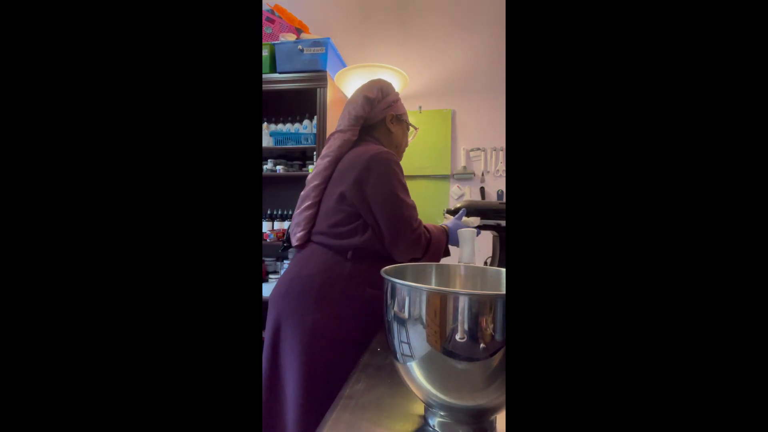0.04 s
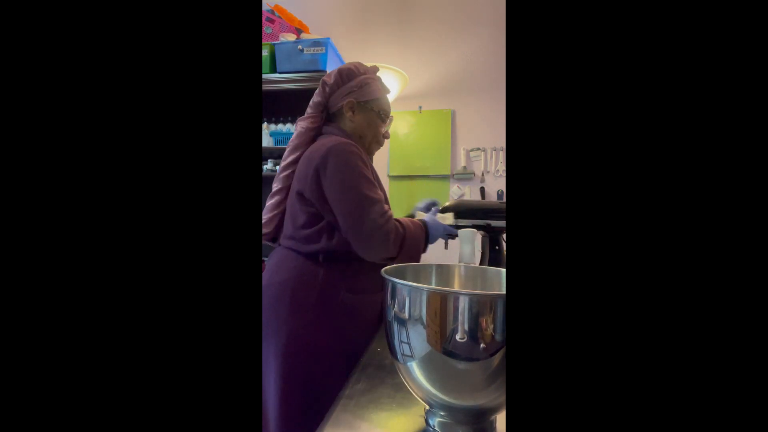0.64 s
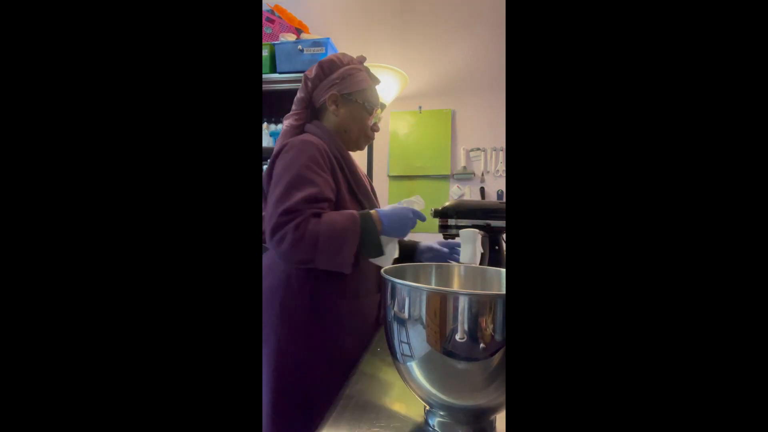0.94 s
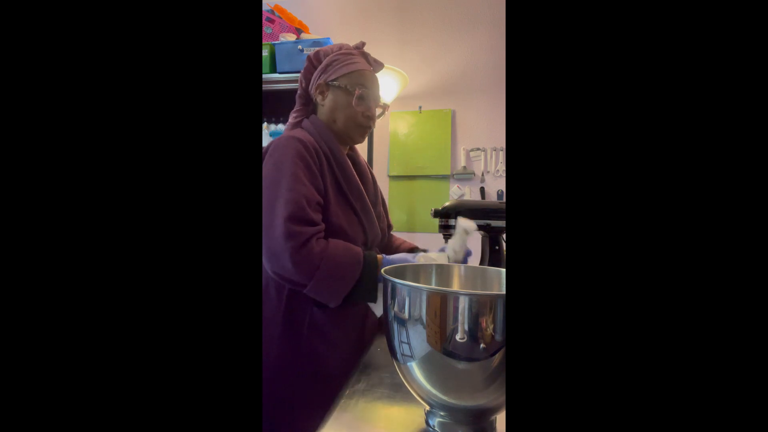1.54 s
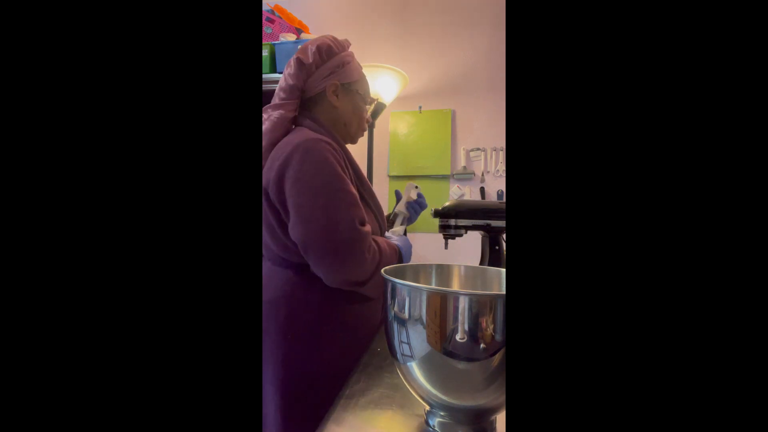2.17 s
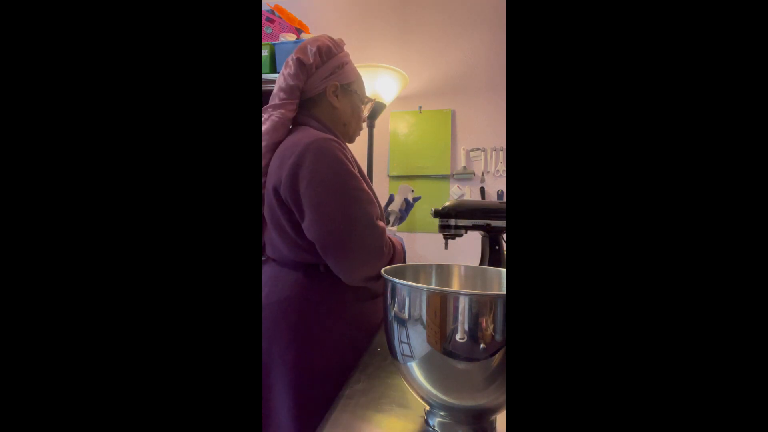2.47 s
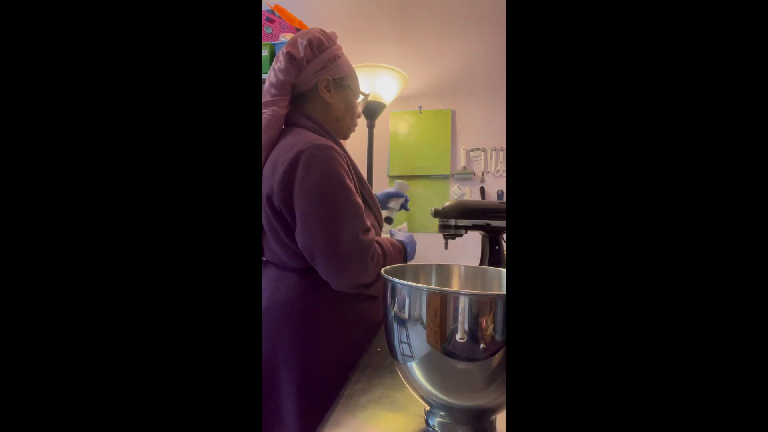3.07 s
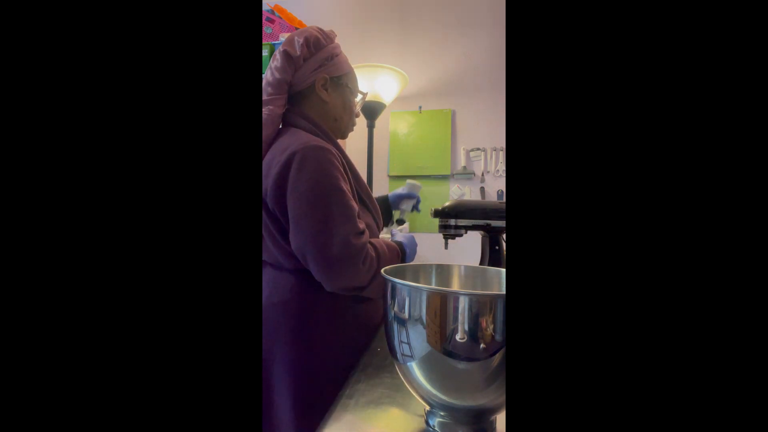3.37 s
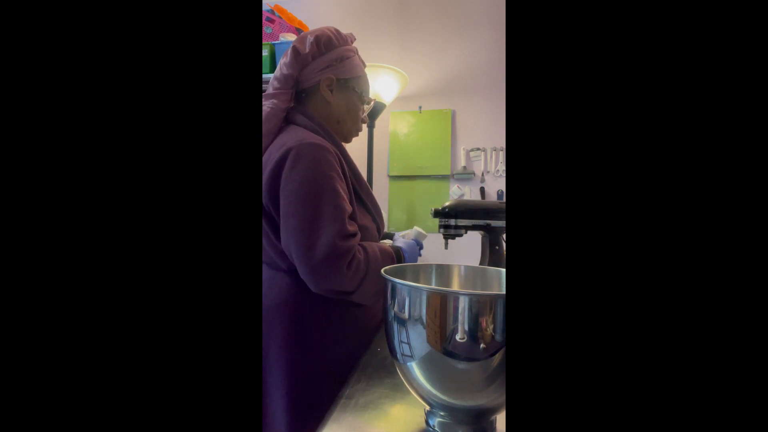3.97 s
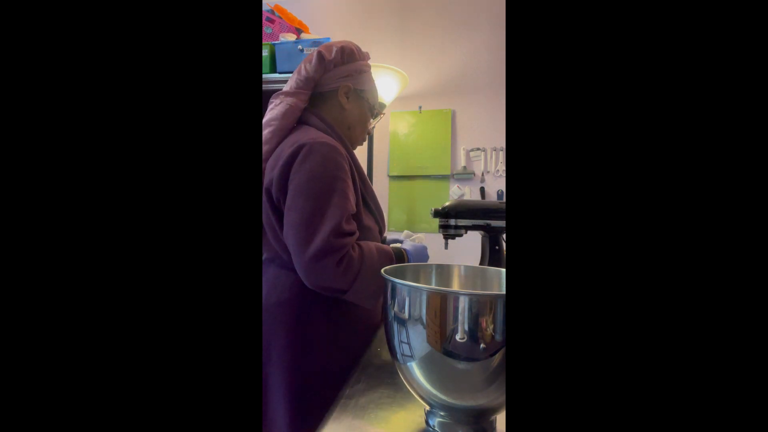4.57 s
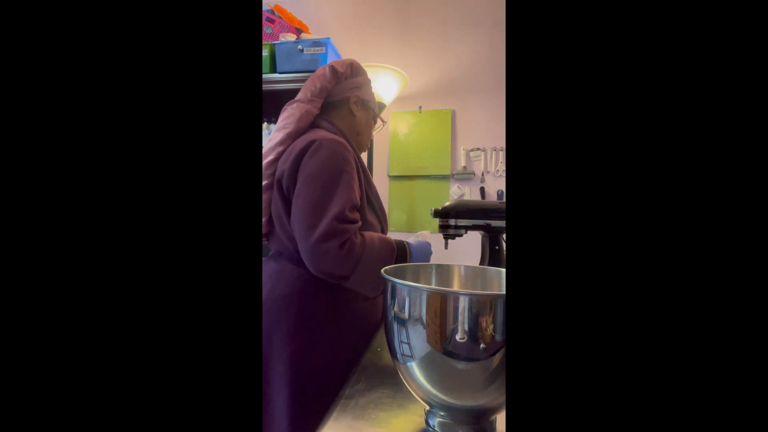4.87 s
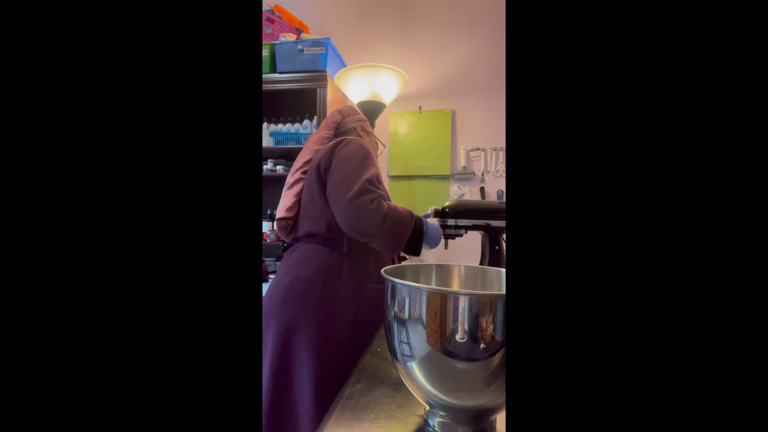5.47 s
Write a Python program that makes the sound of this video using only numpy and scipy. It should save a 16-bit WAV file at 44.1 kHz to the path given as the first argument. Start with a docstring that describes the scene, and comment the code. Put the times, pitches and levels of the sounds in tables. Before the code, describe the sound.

Something slides on a steel counter, a thump and a hard knock follow, then a mist sprayer hisses steadily with faint hollow clunks.

```python
"""A mist sprayer is pumped at a steel kitchen counter: the nozzle hisses steadily on stored pressure
while the hollow bottle clunks at each stroke. Before that, something slides over the steel, a thump
and a container's hard knock shake the counter, and the sprayer is picked up. Gloves rub and crinkle,
a steel bowl rings in sympathy, room air murmurs. The microphone stands on the counter."""
import sys
import numpy as np
from scipy import signal
from scipy.fft import rfft, irfft, next_fast_len
from scipy.io import wavfile
from scipy.ndimage import map_coordinates

SR = 44100
rng = np.random.default_rng(int(sys.argv[2]) if len(sys.argv) > 2 else 0)


def output_pcm(signal):
    """Save a mono or channel-first signal as 16-bit PCM at the path in sys.argv[1].

    Samples are clipped to [-1, 1] before scaling.
    """
    pcm = np.clip(np.atleast_2d(signal).T, -1, 1) * 32767
    wavfile.write(sys.argv[1], SR, np.round(pcm).astype(np.int16))


N = 247401

# modes of the steel sheet: f/Hz, level/dB, t60/s
STEEL_MODES = [(220, -35, 0.58), (394, -39, 2.6), (1728, -34, 1.2), (4205, -51, .75), (5534, -50, 0.5),
               (5635, -53, .5), (6265, -46, 0.42), (6750, -46, 0.65), (6920, -52, 0.9), (7811, -48, 0.6),
               (8260, -50, 0.7), (8667, -51, .6)]
# hiss of sliding on steel: f/Hz, density/dB
SLIDE_HISS_SPECTRUM = [(2500, -6), (4800, -10), (6500, -1), (8200, -3), (10000, -5), (15000, -11)]
# glove friction: f/Hz, density/dB
RUB_SPECTRUM = [(400, -0.5), (800, 4), (1600, 0.5), (2500, 1), (4000, -4), (7000, -13.5)]
# room decay: f/Hz, t60/s
ROOM_DECAY = [(80, 0.26), (300, 0.58), (1000, 0.4), (4000, 0.33), (15000, 0.26)]


def mist():
    """Stored pressure sags slowly and keeps the nozzle hissing; fine spray sputters above the jet."""
    # jet, its lower band, finest spray: f/Hz, density/dB
    jet_spectrum = [(500, -19), (1000, -16), (2400, -6.5), (3200, -6.5), (4200, -3.5), (6000, -2.5),
                    (8100, 0), (9700, -0.5), (12500, -10)]
    low_spectrum = [(3800, -6), (4700, -3), (6000, -16)]
    fine_spectrum = [(9000, -37), (12000, -9.5), (14000, -9.5), (15500, -10.5)]
    # lower band as the nozzle turns: t/s, level/dB re jet
    low_levels = [(2.8, -15), (3.7, -8.5), (3.821, -5.5), (3.919, -11), (4.3, -25.5), (5.1, -20.5)]
    # nozzle sputters: t/s, level/dB
    sputters = [(3.128, -43.5), (3.168, -43.5), (3.241, -45), (3.625, -45.5), (3.83, -53), (4.185, -58)]
    open_s, fine_delay_s = 2.765, 0.006  # fine spray needs full pressure
    flow = dict(hold_s=2.362, rise_s=0.027, fall_s=0.015)
    jet = from_db(-51.5) * swell(open_s, **flow, sag_db_per_s=1)
    fine = from_db(-55) * swell(open_s + fine_delay_s, **flow, sag_db_per_s=1.1)
    for t_s, db in sputters:
        fine = np.hypot(fine, from_db(db) * swell(t_s, hold_s=0.01, rise_s=0.0051, fall_s=0.048))
    stream = friction(jet_spectrum, rough_db=-0.45, slips_per_s=5.9)
    stream = flutter(stream, depth_db=1.8, rate_hz=10.7)
    hiss = jet * stream + fine * friction(fine_spectrum, rough_db=1, slips_per_s=26)
    low_db = np.interp(np.arange(N) / SR, *np.transpose(low_levels))
    hiss += from_db(low_db) * jet * friction(low_spectrum, rough_db=13, slips_per_s=6.7)
    whistle_hz, width_hz = 8149.5, 140  # the nozzle sings as pressure drops
    whistle = rms_one(resonance(stream, whistle_hz, q=whistle_hz / width_hz))
    hiss += from_db(-62) * whistle * swell(5, hold_s=0.3, rise_s=0.11, fall_s=0.13)
    return panned(hiss, pan_db=0.5)


def flutter(x, depth_db, rate_hz):
    """Turbulence makes each treble band swell and fade on its own."""
    centres_hz = np.geomspace(2000, 15000, 8)
    padded = next_fast_len(N)
    hz = np.fft.rfftfreq(padded, 1 / SR)
    spectrum, out = rfft(x, padded), 0
    for share in np.eye(len(centres_hz)):
        band = irfft(spectrum * np.interp(hz, centres_hz, share), padded)[:, :N]
        out += band * from_db(depth_db * drift(rate_hz))
    return rms_one(out)


def bottle():
    """Jolts and trigger strokes ring the bottle as long as the grip allows; fingers tap it faintly."""
    # hollow clunks: t/s, level/dB, f/Hz
    clunks = [(1.271, -41.5, 1002), (1.847, -42.5, 911), (1.932, -37.5, 930), (1.953, -35.5, 905),
              (2.151, -39.5, 780), (2.170, -39, 920), (2.191, -50, 950), (2.272, -44.5, 750),
              (2.491, -50, 714), (2.564, -50.5, 600), (2.741, -49, 1210), (2.995, -49, 947),
              (3.295, -46, 920), (3.592, -44, 937), (3.927, -44.5, 988), (4.249, -42.5, 950),
              (4.786, -45.5, 948), (5.092, -40.5, 820), (5.106, -41, 903), (5.247, -50.5, 860)]
    # plastic wall: f/Hz, density/dB
    shell_spectrum = [(350, -4.5), (650, -1), (1100, -5), (1500, -9), (2600, -17), (5000, -16.5)]
    builds_s = 0.0036 * 1.3 ** rng.standard_normal(len(clunks))
    hollow = sum(hollow_note(clicks([t_s], [db]), hz, build_s)
                 for (t_s, db, hz), build_s in zip(clunks, builds_s))
    times_s, levels_db, _ = np.transpose(clunks)
    when, strength = rng.random((30, 2)).T
    taps = clicks(times_s=1.6 + 3.9 * when, levels_db=-62 + 8 * strength)
    force = taps + from_db(-13) * clicks(times_s, levels_db)
    shell = through(force, burst(shell_spectrum, t60_s=0.02, room_db=-3.5))
    flexing = sum(from_db(db) * swell(t_s, hold_s=0.0034, rise_s=0.003, fall_s=0.022)
                  for t_s, db, _ in clunks)
    wall_band = signal.butter(2, [650, 1150], "band", fs=SR, output="sos")
    wall = from_db(-9.5) * flexing * rms_one(signal.sosfilt(wall_band, noise(shell_spectrum)))
    hollow = from_db(-1.5) * in_kitchen(hollow, wet_db=-7.5, lag_s=-0.000072, pan_db=6.5)
    return hollow + panned(shell + wall, pan_db=4)


def hollow_note(force, hz, build_s):
    """Wall and enclosed air ring together: the note builds up, then dies."""
    t60_s = build_s * np.log(1000)
    return ring(ring(force, hz, t60_s), hz, t60_s) * 2 * np.e / (build_s * SR)


def knock():
    """A container lands hard and rattles to rest, ringing itself and the counter."""
    # contacts: t/s, body level/dB, clatter level/dB
    contacts = [(1.3603, -24, -15.5), (1.3658, 0, -17), (1.372, -24, -16.5), (1.379, -17.5, -17.5),
                (1.3889, -23.5, -14), (1.398, -27.5, -20), (1.408, -25.5, -25), (1.483, -27, -48)]
    # container and counter: f/Hz, level/dB, t60/s
    body_modes = [(83, -19, .8), (141, -13, .48), (215.5, -6.5, 0.44), (281.5, -11.5, 0.53),
                  (310, -5, 0.083), (365, 6.5, 0.17), (398, -30, 1.9), (484, -19, .13), (540.6, -6.5, 0.43),
                  (627, -6.5, .26), (697, -11, 0.15), (801, -11, 0.34), (860, -7.5, .22), (953, -12, .2),
                  (1020, -10, .2), (1104, -10, 0.24), (1274, -23.5, 0.22), (1455, -15.5, .2),
                  (1690, -23, .16), (1994, -18.5, .17)]
    # clatter: f/Hz, density/dB
    clatter_spectrum = [(70, -12.5), (200, 2), (400, 1.5), (700, -2.5), (1050, -10.5), (1400, -12),
                        (3000, -17), (5000, -21), (8300, -21.5), (10000, -22.5), (14500, -28)]
    times_s, body_db, clatter_db = np.transpose(contacts)
    lead_s = 0.0012  # the wall flexes just before it lands fully
    hollow = from_db(-7) * hollow_note(clicks(times_s[:1] - lead_s, [0]), hz=930, build_s=0.0019)
    body = from_db(-15.5) * modal(clicks(times_s, body_db), body_modes, neighbour_sign=1)
    clatter = through(clicks(times_s, clatter_db), burst(clatter_spectrum, t60_s=0.12, room_db=-13))
    return in_kitchen(body, wet_db=-20, lag_s=0.00001, pan_db=3) + hollow + panned(clatter, pan_db=1)


def thumps():
    """Soft blows wake the counter's low modes; the heaviest starts with a crack."""
    # dull blows: t/s, level/dB, contact time/s
    blows = [(0.757, -16, 0.0032), (0.9045, -11, .0016), (0.9106, 4, 0.0034), (0.959, -14.5, 0.008),
             (1.129, -23, 0.003), (1.281, -22, 0.0016), (1.297, -22, 0.00072), (1.379, -11, 0.0067),
             (1.48, -15.5, 0.0013), (1.726, -32, 0.00058)]
    # counter top: f/Hz, level/dB, t60/s
    counter_modes = [(53.7, -25.5, 0.51), (72.1, -16, 0.35), (95, -21, 0.32), (118.3, -18, 0.45),
                     (136.6, -16.5, 0.18), (183, -12, 0.19), (212, -13, 0.079), (243.7, -14.5, 0.22),
                     (275.8, -15.5, 0.23), (420, -16, 0.11), (507, -15.5, 0.064)]
    # sharp edges of the heaviest blow: t/s, level/dB
    cracks = [(.904, -15), (0.9109, -31.5)]
    # crack: f/Hz, density/dB
    crack_spectrum = [(100, 4.5), (300, 4), (600, -1.5), (1000, -13), (2200, -15), (4000, -24), (8000, -27),
                      (15000, -30.5)]
    t = np.arange(N) / SR
    force = 0
    for t_s, db, contact_s in blows:
        pulse = np.exp(-np.pi * ((t - t_s) / contact_s * 2) ** 2)
        force += from_db(db) * pulse / pulse.sum()
    crack = through(clicks(*np.transpose(cracks)), burst(crack_spectrum, t60_s=0.13, room_db=-12.5))
    # the microphone's stand rocks sideways
    rocking = from_db(-22.5) * ring(force, hz=60, t60_s=0.35) * [[1], [-1]]
    counter = in_kitchen(modal(force, counter_modes), wet_db=-8, lag_s=0.00008, pan_db=1.5)
    return counter + crack + rocking


def slide():
    """Pushes shake and scrape the counter; the steel is ringing from the start until a hand damps it."""
    # pushes: t/s, length/s, rumble level/dB, scrape level/dB, hiss level/dB
    pushes = [(0.0, 0.25, -26, -36, -43.5), (0.365, 0.046, -24.5, -38.5, -55.5),
              (0.534, 0.11, -34, -53.5, -62), (0.763, 0.31, -44, -49, -64)]
    # counter rumble, surface scrape: f/Hz, density/dB
    rumble_spectrum = [(37, -1.5), (54, 2), (91, -2), (166, -9), (215, -1), (247, -9.5), (295, -12.5),
                       (398, -8), (451, -20.5), (633, -15), (700, -36), (910, -25), (1540, -120)]
    scrape_spectrum = [(300, -11), (600, 1.5), (1400, -5), (2500, -14.5), (4500, -18), (9000, -55)]
    rumble = scrape = hiss = 0
    for t_s, length_s, rumble_db, scrape_db, hiss_db in pushes:  # each fades as it slows
        push = dict(start_s=t_s, hold_s=length_s, rise_s=0.058, fall_s=0.11)
        rumble += from_db(rumble_db) * swell(**push, sag_db_per_s=41)
        scrape += from_db(scrape_db) * swell(**push, sag_db_per_s=35.5)
        hiss += from_db(hiss_db) * swell(**push, sag_db_per_s=35)
    rub = from_db(2) * rumble * friction(rumble_spectrum, rough_db=3.5, slips_per_s=15)
    rub += scrape * friction(scrape_spectrum, rough_db=2.5, slips_per_s=48)
    rub += from_db(1) * hiss * friction(SLIDE_HISS_SPECTRUM, rough_db=3, slips_per_s=56)
    undamped = np.interp(np.arange(N) / SR, [0, 0.05, 0.24, 0.34], [0.4, 1, 1, 0])
    steel = modal(clicks([0], [0]), STEEL_MODES) * undamped
    return panned(rub, pan_db=1.2) + in_kitchen(steel, wet_db=-4, lag_s=0.00002, pan_db=1.5)


def scuffs():
    """The dragged object catches and rubs out the steel's high modes, broadened by the contact."""
    # catches: t/s, length/s, level/dB
    catches = [(0.024, 0.0057, -38), (0.074, 0.029, -42.5), (0.438, 0.0072, -53.5)]
    width_hz = 93
    pressure = sum(from_db(db) * swell(t_s, length_s, rise_s=0.0034, fall_s=0.042)
                   for t_s, length_s, db in catches)
    grain = friction(SLIDE_HISS_SPECTRUM, rough_db=3.5, slips_per_s=290)
    modes = sum(resonance(grain, hz, q=hz / width_hz) for hz, _, _ in STEEL_MODES if hz > 4000)
    return pressure * (rms_one(modes) + from_db(0.5) * grain)


def gloves():
    """Gloves and sleeves rub and crinkle with each move; plastic ticks under the fingers."""
    # moves: t/s, rise/s, hold/s, rub level/dB, crinkle level/dB
    moves = [(1.269, .003, 0.013, -48.5, -56), (1.341, 0.005, 0.014, -44, -55),
             (1.536, 0.022, .01, -56, -63), (1.615, 0.004, 0.012, -60, -66),
             (1.724, 0.0026, 0.012, -59.5, -67), (1.853, 0.14, 0.012, -49, -51),
             (1.957, 0.0054, .004, -50.5, -69), (2.158, .005, 0.047, -77, -56.5),
             (2.266, 0.03, 0.0072, -53, -66), (2.55, 0.0034, 0.013, -52.5, -57.5),
             (2.63, .006, 0.011, -77, -63), (2.736, .002, 0.018, -51, -68), (3.103, .1, 0.058, -51, -51.5),
             (3.246, 0.03, .005, -54, -57), (3.95, .1, 0.19, -62.5, -60), (5.089, 0.028, 0.012, -62, -56.5),
             (5.232, 0.06, 0.099, -64.5, -51), (5.538, 0.035, 0.041, -62, -54.5)]
    # plastic and glove ticks: t/s, level/dB
    touches = [(0.3543, -31), (0.4394, -35), (0.553, -37), (0.7398, -39), (1.124, -39), (1.27, -32),
               (1.3354, -43), (1.5475, -41), (1.6155, -39), (1.7225, -28), (1.848, -32), (1.8557, -36),
               (1.89, -37), (1.954, -20), (1.961, -27), (2.147, -33.5), (2.273, -35), (2.492, -42),
               (2.5515, -31), (2.6293, -34), (2.741, -31), (3.117, -31), (3.239, -29)]
    # crinkle, tick: f/Hz, density/dB
    crinkle_spectrum = [(2500, 2), (4500, 3.5), (8000, 7), (10000, 3.5), (15000, 0)]
    tick_spectrum = [(600, -8), (1500, -1.5), (3000, 0.5), (5000, 2), (7800, 3.5), (10000, 1), (15000, -8)]
    rub = crinkle = 0
    for t_s, rise_s, hold_s, rub_db, crinkle_db in moves:
        move = swell(t_s, hold_s, rise_s, fall_s=0.088)
        rub += from_db(rub_db) * move
        crinkle += from_db(crinkle_db) * move
    rustle = from_db(-1) * rub * friction(RUB_SPECTRUM, rough_db=3.5, slips_per_s=40)
    rustle += from_db(-1.5) * crinkle * friction(crinkle_spectrum, rough_db=2.5, slips_per_s=130)
    ticks = through(clicks(*np.transpose(touches)), burst(tick_spectrum, t60_s=0.011, room_db=-17.5))
    return panned(rustle + from_db(-13) * ticks, pan_db=1)


def rasps():
    """Rubber catches on plastic: rough noise in one broad resonance."""
    # glove drags: t/s, level/dB, f/Hz
    drags = [(1.532, -49, 2150), (3.119, -45, 1800), (3.962, -55, 1730), (5.558, -52.5, 2224)]
    grain, out = friction(RUB_SPECTRUM, rough_db=3.5, slips_per_s=59), 0
    for t_s, db, hz in drags:
        band = rms_one(resonance(grain, hz, q=3.2))
        out += from_db(db) * band * swell(t_s, hold_s=0.0056, rise_s=0.019, fall_s=0.054)
    return out


def bowl(sound):
    """A steel mixing bowl by the microphone rings in sympathy."""
    # resonances: f/Hz, width/Hz, level/dB
    bowl_modes = [(2070, 67, -9.5), (2240, 31, -8), (2596, 45, -4), (4170, 29, -3.5), (4780, 20, -5.5),
                  (6975, 30, -5), (7880, 35, 0), (8560, 35, -9)]
    return sum(from_db(db) * resonance(sound, hz, q=hz / width_hz) for hz, width_hz, db in bowl_modes)


def off_the_counter(x, echo_db, delay_s, sway):
    """A reflection from the steel top combs the sound; its path changes as the hands move."""
    lag_samples = delay_s * SR * np.exp(sway * drift(rate_hz=1.2))
    echo = np.array([map_coordinates(channel, [np.arange(N) - lag_samples], order=3) for channel in x])
    return (x + from_db(echo_db) * echo) / np.sqrt(1 + from_db(echo_db) ** 2)


def in_kitchen(x, wet_db, lag_s, pan_db):
    """Direct sound, the left lagging by lag_s, then scattered reflections."""
    t = np.arange(N) / SR
    decay = from_db(-60 * t[:SR] / at_hz(ROOM_DECAY, 500)) * (t[:SR] > 0.005)
    walls = noise([(30, 0), (16000, 0)], size=SR) * decay
    walls /= np.sqrt(np.sum(walls ** 2) / 2)
    direct = panned(np.array([np.interp(t - lag_s, t, x), x]), pan_db)
    return direct + from_db(wet_db) * through(x, walls)


def room_air():
    """A low murmur of moving air slowly ebbs under faint hiss."""
    # murmur, hiss: f/Hz, density/dB
    murmur_spectrum = [(30, -8), (54, 4.5), (81, -4), (252, -7.5), (295, -8), (328, -3), (454, -16.5),
                       (530, -9), (710, -13.5), (1200, -24), (1560, -50.5), (2640, -120)]
    hiss_spectrum = [(500, -14.5), (1000, -8.5), (2000, -7.5), (4000, -10), (15000, -21.5)]
    ebb_db_per_s = 1.18
    ebb = from_db(-ebb_db_per_s * np.arange(N) / SR)
    murmur = friction(murmur_spectrum, rough_db=1.5, slips_per_s=12)
    return from_db(-52.5) * ebb * panned(murmur, pan_db=2) + from_db(-72) * noise(hiss_spectrum)


def friction(spectrum, rough_db, slips_per_s):
    """Noise whose level catches and lets go; rms 1."""
    return rms_one(noise(spectrum) * from_db(rough_db * drift(slips_per_s)))


def burst(spectrum, t60_s, room_db):
    """Impact response: dense short-lived modes plus the room's tail, shorter in the treble."""
    t, grain = np.arange(SR) / SR, noise(spectrum, size=SR)
    centres_hz = np.geomspace(60, 15000, 9)
    hz = np.maximum(np.fft.rfftfreq(SR, 1 / SR), 1)
    colour, tail = rfft(grain), 0
    for centre_hz, share in zip(centres_hz, np.eye(len(centres_hz))):
        band = irfft(colour * np.interp(np.log(hz), np.log(centres_hz), share), SR)
        tail += band * from_db(-60 * t / at_hz(ROOM_DECAY, centre_hz))
    return grain * from_db(-60 * t / t60_s) + from_db(room_db) * tail


def noise(spectrum, size=N):
    """Coloured stereo noise, falling steeply beyond the spectrum's ends; rms 1."""
    # left-right likeness: f/Hz, correlation
    likeness = [(55, 0.86), (130, 1), (300, 0.56), (640, 0.16), (1400, 0.24), (3100, 0.29), (5600, 0.083),
                (7000, 0.68), (9500, 0.85), (11000, 1), (13000, 0.89), (15000, 1)]
    padded = next_fast_len(size)
    hz = np.maximum(np.fft.rfftfreq(padded, 1 / SR), 1)
    skirts = np.sqrt(1 + (spectrum[0][0] / hz) ** 8 + (hz / spectrum[-1][0] / 1.2) ** 8)
    gain = from_db(at_hz(spectrum, hz)) / skirts
    alike = np.clip(at_hz(likeness, hz), -1, 1)
    mid, side = rfft(rng.standard_normal((2, padded)))
    stereo = np.sqrt(1 + alike) * mid + np.sqrt(1 - alike) * side * [[1], [-1]]
    return rms_one(irfft(gain * stereo, padded)[:, :size])


def drift(rate_hz):
    """Slow random wander, spread 1."""
    step, settle = 40, 2000
    pole = np.exp(-2 * np.pi * rate_hz * step / SR)
    white = rng.standard_normal(N // step + settle + 2)
    slow = signal.lfilter([1], [1, -2 * pole, pole * pole], white)[settle:]
    return np.interp(np.arange(N) / step, np.arange(len(slow)), rms_one(slow))


def swell(start_s, hold_s, rise_s, fall_s, sag_db_per_s=0):
    """Gain that reaches 1 at start_s, sags, then falls; rise_s and fall_s are per 20 dB."""
    t = np.arange(N) / SR - start_s
    decades = np.minimum(t, 0) / rise_s - np.maximum(t - hold_s, 0) / fall_s
    sag_db = sag_db_per_s * np.clip(t, 0, hold_s)
    return from_db(np.maximum(20 * decades - sag_db, -200))


def modal(force, modes, neighbour_sign=-1):
    """Mode bank; with neighbours in opposite phase the body takes a moment to build up."""
    return sum(neighbour_sign ** k * from_db(db) * ring(force, hz, t60_s)
               for k, (hz, db, t60_s) in enumerate(modes))


def ring(force, hz, t60_s):
    """One mode: a unit click starts a decaying sine of height 1."""
    radius, angle = from_db(-60 / (t60_s * SR)), 2 * np.pi * hz / SR
    return signal.lfilter([0, np.sin(angle)], [1, -2 * radius * np.cos(angle), radius ** 2],
                          force + 1e-18)


def resonance(x, hz, q):
    """Band-pass with unity peak gain."""
    return signal.lfilter(*signal.iirpeak(hz, q, fs=SR), x)


def clicks(times_s, levels_db):
    """One impulse per contact."""
    out = np.zeros(N)
    np.add.at(out, np.round(np.asarray(times_s) * SR).astype(int), from_db(levels_db))
    return out


def through(force, response):
    """Convolve a force with a stereo response."""
    return signal.fftconvolve(force[None], response, axes=1)[:, :N]


def panned(x, pan_db):
    """Positive leans left."""
    return x * from_db([[pan_db / 2], [-pan_db / 2]])


def at_hz(points, hz):
    """Read a table on a log-frequency axis."""
    points_hz, values = np.transpose(points)
    return np.interp(np.log(hz), np.log(points_hz), values)


def from_db(db):
    """Decibels to gain."""
    return 10 ** (np.asarray(db) / 20)


def rms_one(x):
    """Scale to rms 1."""
    return x / np.sqrt(np.mean(x ** 2) + 1e-20)


def scene():
    """Work at the counter and the bowl's answer, over room air."""
    hands = off_the_counter(gloves() + rasps() + mist(), echo_db=-11.5, delay_s=0.0018, sway=0.12)
    work = slide() + scuffs() + thumps() + knock() + bottle() + hands
    return work + bowl(work) + room_air()


def record(dry):
    """Microphone: the farther left port lags; deep bass is cut, peaks are rounded, the top is cut."""
    port_lag_s, ceiling = 0.0001356, 0.92
    low_cut_hz, high_cut_hz = 43, 15900
    left = map_coordinates(dry[0], [np.arange(N) - port_lag_s * SR], order=3)
    high_pass = signal.butter(4, low_cut_hz, "high", fs=SR, output="sos")
    ports = signal.sosfilt(high_pass, np.array([left, dry[1]]))
    rounded = ports / (1 + (ports / ceiling) ** 6) ** (1 / 6)
    low_pass = signal.ellip(10, 0.1, 80, high_cut_hz, fs=SR, output="sos")
    return signal.sosfilt(low_pass, rounded)


dry = scene()
out = record(dry)
output_pcm(out)
```